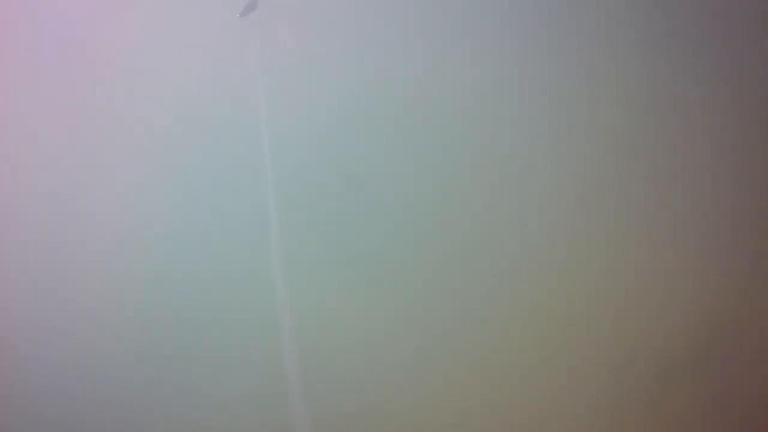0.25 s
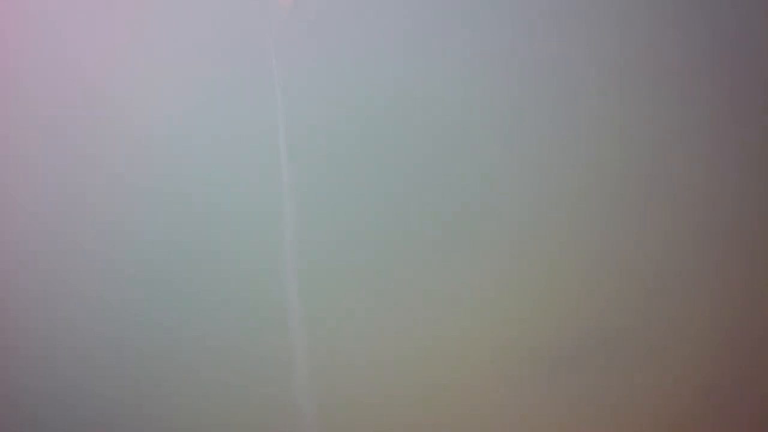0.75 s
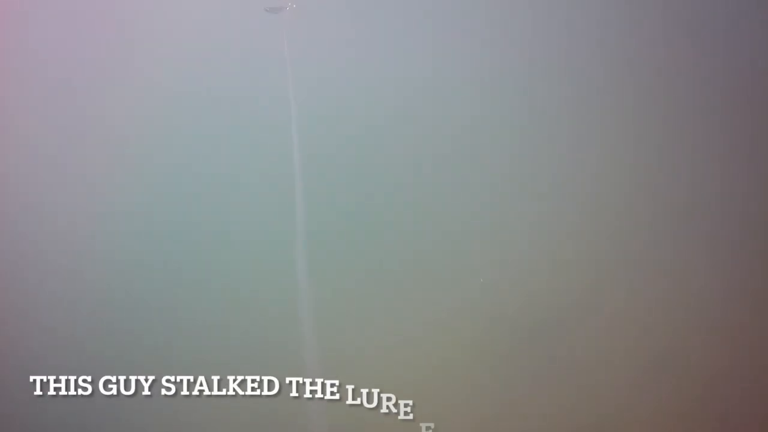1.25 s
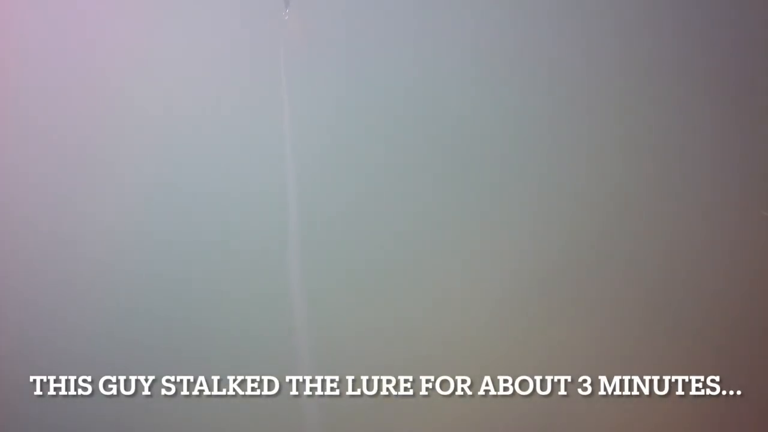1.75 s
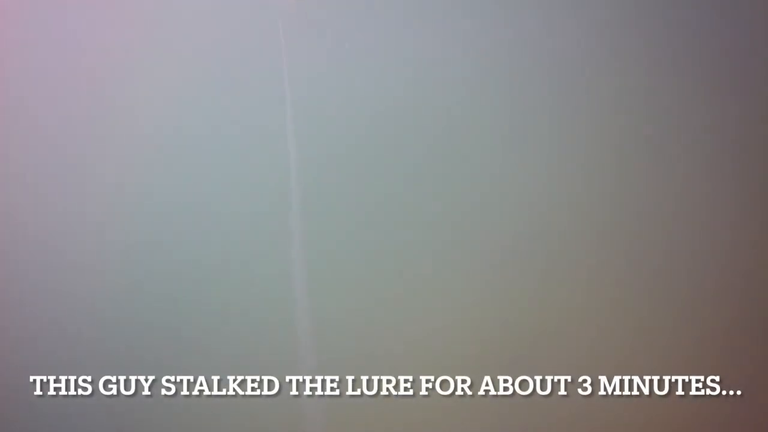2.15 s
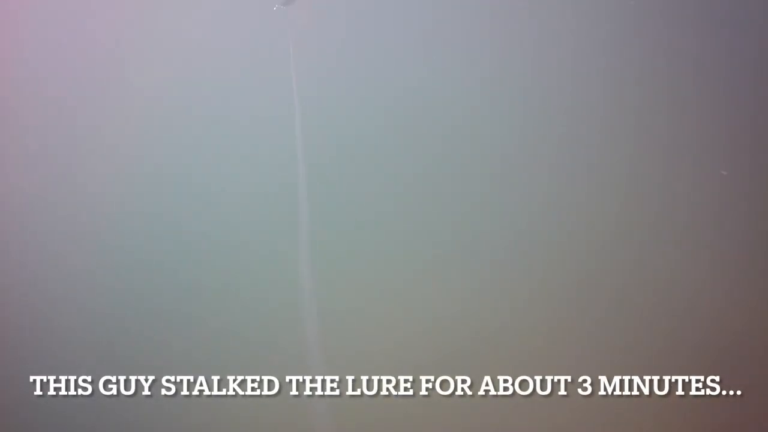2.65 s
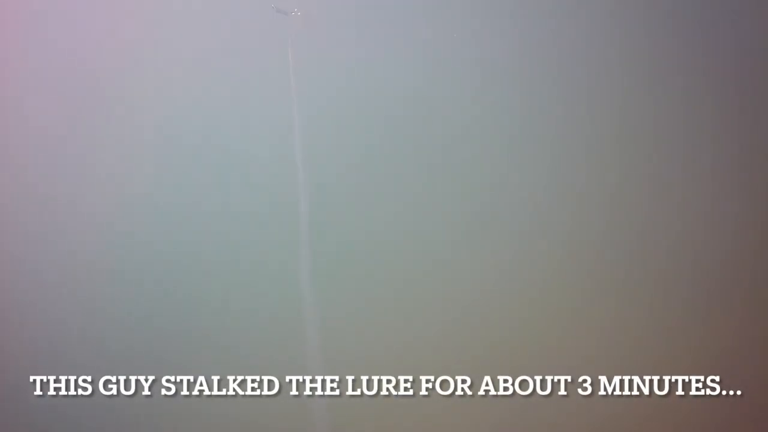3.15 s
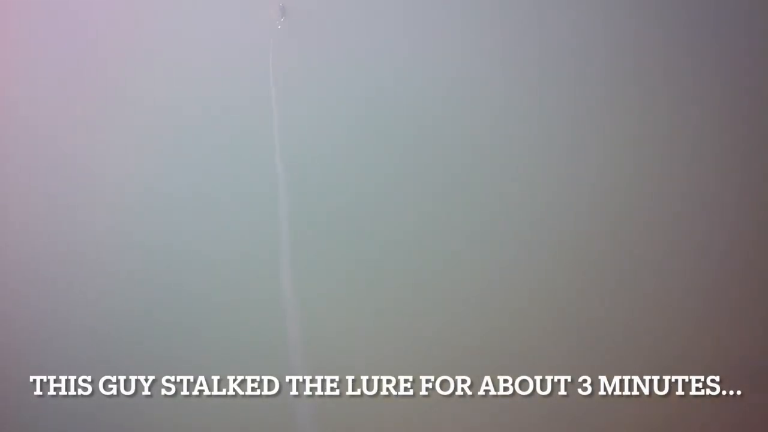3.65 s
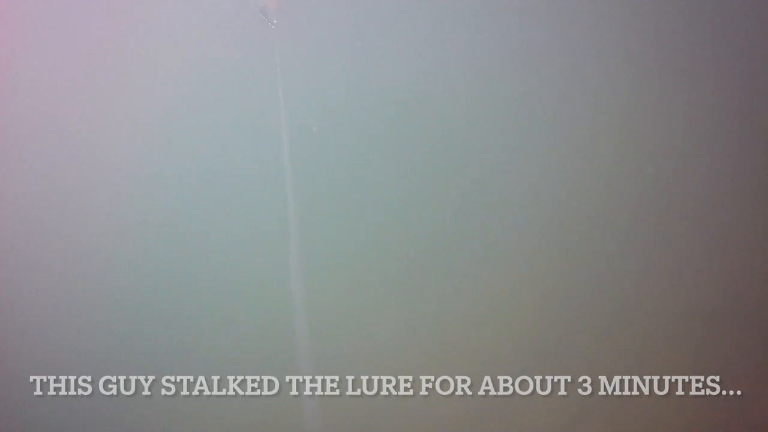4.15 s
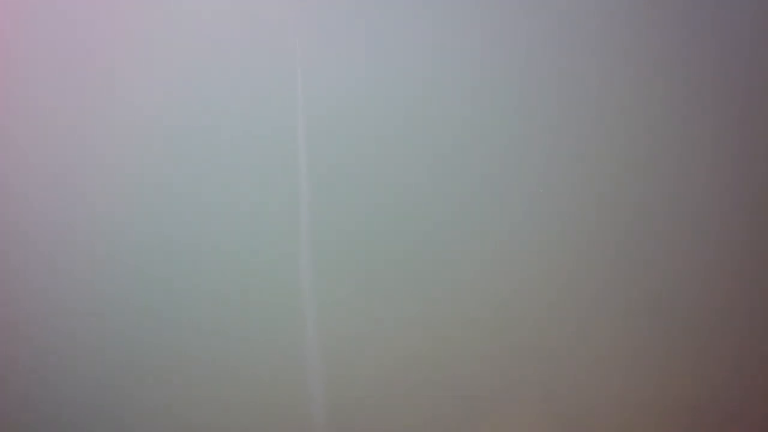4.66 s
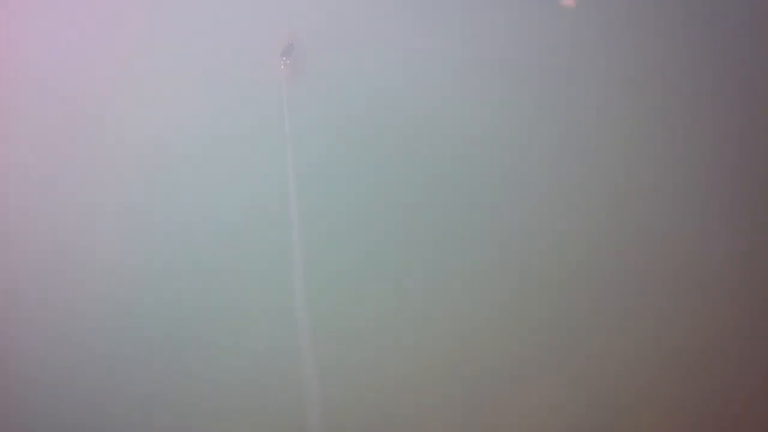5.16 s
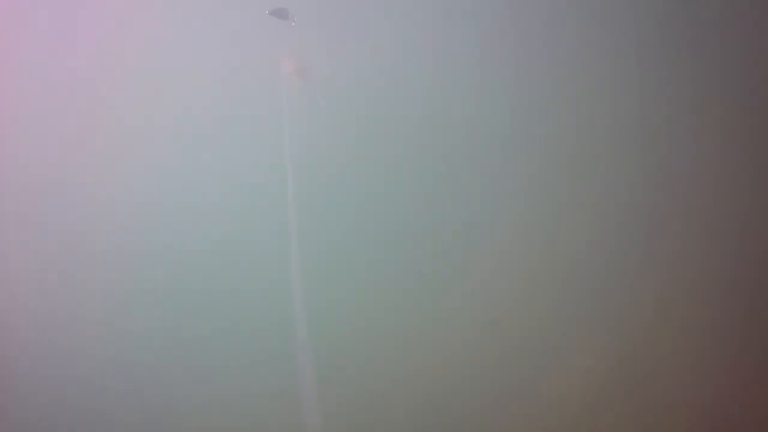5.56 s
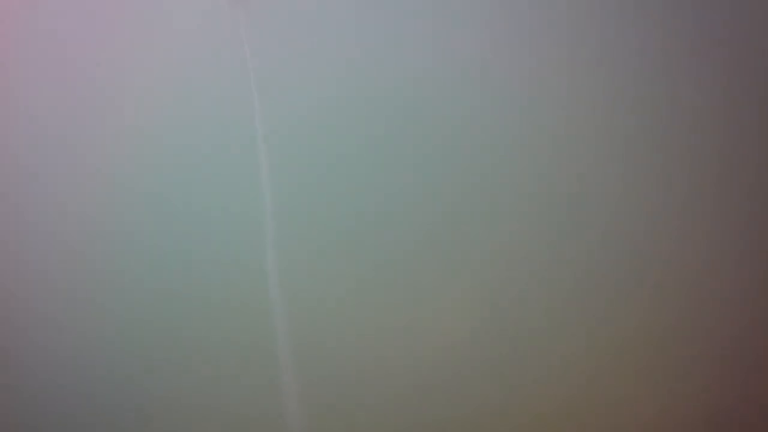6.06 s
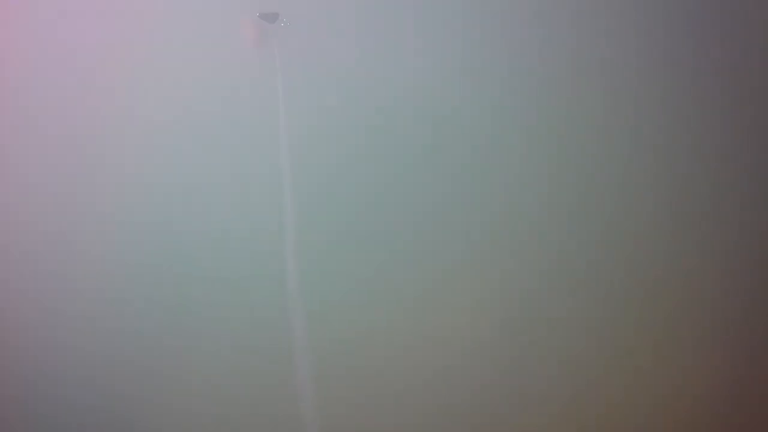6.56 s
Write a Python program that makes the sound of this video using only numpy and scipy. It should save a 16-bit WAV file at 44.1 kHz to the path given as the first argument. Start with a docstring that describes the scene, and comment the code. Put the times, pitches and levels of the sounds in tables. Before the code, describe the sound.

A low, wavering boat motor drone and rumbling water heard from below the surface, with small tackle ticks and a few bubble plinks.

```python
"""Under water behind a boat, heard from inside a towed camera housing through its two microphone ports.
The motor's firing hum arrives by several paths, so it swells and fades differently at each port. Its
overtones and sidebands drone with the hull's resonances inside the rush of water, and a faint gear whine
surfaces once. Close by, a loose tackle part ticks against the housing and a few bubbles plink.
A grainy hiss lies over all."""
import sys
import numpy as np
from scipy import signal
from scipy.fft import rfft, irfft, next_fast_len
from scipy.io import wavfile
from scipy.ndimage import map_coordinates

SR = 44100
rng = np.random.default_rng(int(sys.argv[2]) if len(sys.argv) > 2 else 0)


def pcm_store(signal):
    """Save signal as 16-bit PCM."""
    levels = np.round(np.clip(np.atleast_2d(signal), -1, 1) * 32767)
    wavfile.write(sys.argv[1], SR, levels.astype(np.int16).T)


N = 299880


def amp(db):
    """Decibels to gain."""
    return 10 ** (np.asarray(db) / 20)


def unit(x):
    """Scaled to rms 1."""
    return x / np.sqrt(np.mean(x ** 2) + 1e-20)


def along(points, hz):
    """Interpolates (frequency, value) points on a log frequency axis."""
    freqs, values = np.transpose(points)
    return np.interp(np.log(hz + 1), np.log(freqs + 1), values)


def curves(rows):
    """One value per sample for each column after the time."""
    times, *columns = np.transpose(rows)
    return [np.interp(np.arange(N) / SR, times, column) for column in columns]


def wobble(rate):
    """A random curve, rate knots a second."""
    knots = rng.standard_normal(int(N * rate / SR) + 4)
    return map_coordinates(knots, [np.arange(N) * rate / SR], order=1)


def filtered(x, response):
    """x through a frequency response."""
    size = next_fast_len(N + 8192)
    return irfft(rfft(x, size) * response(np.fft.rfftfreq(size, 1 / SR)), size)[..., :N]


def panned(x, pan_db):
    """Sets the left port pan_db above the right."""
    return x * amp([[pan_db / 2], [-pan_db / 2]])


def port_noise(gain):
    """Stereo noise of rms 1, shaped by gain(hz); the ports agree more as the frequency rises."""
    # (frequency [Hz], left-right correlation [0-1])
    likeness = [(50, 0.017), (80, 0), (150, 0.31), (600, 0.47), (1200, 0.54), (1700, 0.99), (2100, 1)]
    angle = lambda hz: np.arccos(along(likeness, hz)) / 2
    white = rng.standard_normal((2, N))
    mid, side = filtered(white, lambda hz: gain(hz) * [np.cos(angle(hz)), np.sin(angle(hz))])
    return unit(np.array([mid + side, mid - side]))


def hiss():
    """A fine hiss, alike at both ports, whose level flickers quickly."""
    # hiss colour: (frequency [Hz], relative level [dB])
    spectrum = [(6500, 1), (11000, 0.5), (13500, 2), (15700, 3.5)]
    flicker = amp(0.49 * wobble(300) + 0.93 * wobble(5000))
    noise = port_noise(lambda f: amp(along(spectrum, f)) * (f > 2000))
    return amp(-46.5) * unit(flicker * noise)


def water_rush():
    """Turbulence rumbles right on the housing, with a lighter wash above it."""
    # strength of the flow: (time [s], rumble level [dB], wash level [dB])
    flow = [(0, -27, -42.5), (1.1, -25, -42.5), (2.4, -24.5, -42.5), (3.2, -24, -41.5), (4.1, -24.5, -42),
            (4.8, -24.5, -41.5), (5.8, -23.5, -43), (6.8, -24.5, -43.5)]
    # colour of each: (frequency [Hz], relative level [dB])
    rumble_spectrum = [(30, -50), (40, -18), (60, -4.5), (110, -8), (180, -11), (290, -16.5), (540, -24),
                       (600, -30), (900, -47), (2000, -120)]
    wash_spectrum = [(200, -80), (500, -3.5), (800, -0.5), (1500, -7.5), (3000, -12), (4200, -15.5),
                     (4800, -21), (7000, -47), (9000, -120)]
    rumble_db, wash_db = curves(flow)
    rumble = panned(port_noise(lambda f: amp(along(rumble_spectrum, f))), pan_db=0.2)
    wash_gain = amp(wash_db + 0.31 * wobble(11) + 0.88 * wobble(60))
    wash = port_noise(lambda f: amp(along(wash_spectrum, f)))
    return amp(rumble_db) * rumble + wash_gain * wash


def gear_whine(hz=1110, from_s=2.45, to_s=3.46, fade_db_per_s=22):
    """A thin, wavering gear tone that surfaces for a while."""
    t = np.arange(N) / SR
    away_s = np.maximum(0, np.maximum(from_s - t, t - to_s))
    db = -55 - fade_db_per_s * away_s + 4.5 * wobble(14)
    phase = 2 * np.pi * np.cumsum(hz + 5 * wobble(20)) / SR
    return np.sqrt(2) * amp(db) * np.sin(phase)


def droning_tones(tone_share=0.59):
    """The motor hum's overtones and sidebands, with the hull's resonances: wavering tones in noise."""
    # (frequency [Hz], width [Hz], base level before the turn [dB], after it [dB], left over right [dB])
    tones = [(43.2, 3.4, -65, -49, -17), (60.7, 3.06, -37, -29, -6.5), (70.8, 5.18, -31, -40, -3),
             (88.8, 4.6, -33, -39, -6), (100.7, 4.83, -45.5, -34.5, 6), (128.8, 6.35, -49, -34.5, 9.5),
             (149.4, 6.16, -38.5, -34.5, -3), (159.8, 4.36, -46, -36.5, -1), (171.4, 7.13, -59, -31.5, -10),
             (189.6, 5.7, -50, -36, -3.5), (212, 4.4, -37, -45, -6), (243.5, 9.72, -43, -37.5, -3.5),
             (265.8, 9.13, -37.5, -44, 9), (278.5, 4.16, -45.5, -47, 10.5), (315.8, 5.74, -40.5, -45, -6.5),
             (343.7, 4.27, -45.5, -48.5, -1), (365.6, 7.45, -41.5, -44, 2.5), (391, 4.2, -48.5, -59, -3),
             (401, 4.15, -47.5, -57, -3), (469.5, 5.8, -50.5, -49, 5), (521, 21.1, -45, -46, -2.5),
             (603, 4.8, -55, -59.5, 5), (657, 11.7, -54.5, -57.5, 9), (794, 3.28, -59.5, -56.5, -2),
             (834, 6.3, -63, -59.5, -4), (901, 5.05, -63, -61, -6)]
    # the housing turns, shifting the mix: (time [s], share of the turn [0-1])
    swing = [(2.5, 0), (3.3, 0.92), (4.4, 1)]
    # swell of all tones together: (time [s], gain [dB])
    swell = [(0, 0.5), (1.5, -0.5), (3.6, 2.5), (5.0, 0.5), (6.8, -2.5)]
    (turned,), (swell_db,) = curves(swing), curves(swell)
    out = np.zeros((2, N))
    for hz, width, before_db, after_db, pan_db in tones:
        ring = port_noise(lambda f: 1 / (1 + (2 * (f - hz) / width) ** 2))
        phase = 2 * np.pi * np.cumsum(hz + 0.3986 * width * wobble(8)) / SR
        port_drift = 1.06 * np.array([wobble(1.99), wobble(2.024)])
        tone = np.sqrt(2) * np.sin(phase + port_drift)
        drone = np.sqrt(1 - tone_share) * ring + np.sqrt(tone_share) * tone
        out += amp(before_db + turned * (after_db - before_db) + swell_db) * panned(drone, pan_db)
    return out


def bubble_plinks(attack_s=0.00086, t60_s=0.025):
    """A small bubble bursting at the port rings for a few dozen cycles, rising a little in pitch."""
    # (time [s], level [dB], starting pitch [Hz])
    bubbles = [(0.6285, -37, 2970), (0.7068, -30.5, 2540), (1.079, -42, 1810), (1.1233, -32, 2400),
               (1.1794, -40, 2050), (1.6222, -37, 2800), (1.7609, -33, 2460), (2.075, -32, 2500),
               (3.3393, -40, 2360), (5.3327, -36, 2180), (5.8533, -34, 2360)]
    out, t = np.zeros(N + SR), np.arange(SR // 20) / SR
    for s, db, hz in bubbles:
        ring = np.sin(2 * np.pi * hz * (t + 1.6 * t * t)) * (1 - np.exp(-t / attack_s))
        out[round(s * SR):][:len(t)] += amp(db - 60 * t / t60_s) * ring
    return out[:N]


def tackle_ticks(attack_s=0.00044, crack_t60_s=0.0051, small_per_s=340):
    """A loose part strikes the housing and rings it briefly: clear ticks among many small random ones."""
    # housing modes: (frequency [Hz], relative level [dB], time to fall 60 dB [s])
    modes = [(2850, -3.5, 0.012), (3650, -1, 0.0085), (3827, 0, 0.0081), (4067, -2, 0.012),
             (5360, 2.5, 0.0057), (5600, 2, 0.016)]
    # clear contacts: (time [s], strength [dB])
    contacts = [(0.0423, -33), (0.7951, -35), (1.3678, -34), (1.3902, -36), (1.6656, -33.5), (1.898, -36),
                (1.9674, -34), (2.0757, -36), (2.6998, -34), (2.785, -34), (2.8389, -37), (3.1462, -38),
                (3.34, -36.5), (3.491, -33), (3.5653, -35), (3.6373, -37), (3.704, -36), (3.92, -33),
                (4.0567, -35), (4.114, -36), (4.35, -30), (4.3919, -31), (4.4985, -33), (4.5563, -36),
                (4.6314, -37), (4.6857, -32), (4.7294, -33), (4.7706, -30), (4.9651, -41), (5.1208, -32),
                (5.14, -36), (5.2274, -37), (5.3208, -38), (5.3963, -36), (5.462, -31), (5.5487, -35),
                (5.6022, -32), (5.6545, -31), (5.677, -36), (5.8249, -37), (5.9189, -41), (6.1665, -36),
                (6.2211, -41), (6.344, -34)]
    # small contacts: (time [s], strength [dB], spin of the part [turns/s])
    rattle = [(0, -47, 14), (1.4, -47, 13.5), (1.75, -45, 14.2), (2.2, -49, 14.3), (3.9, -47.5, 14),
              (4.6, -43, 21), (5.6, -45, 18.5), (6.8, -46.5, 14.8)]
    t = np.arange(SR // 30) / SR
    attack = 1 - np.exp(-t / attack_s)
    rings = [amp(db - 60 * t / t60) * np.sin(2 * np.pi * hz * t) * attack for hz, db, t60 in modes]
    upper = np.array([hz > 5000 for hz, *_ in modes] + [False])  # contacts ring these modes less
    blows = np.zeros((len(modes) + 1, N))  # a row per mode, and one for the crack
    for s, db in contacts:
        scatter, polarity = rng.standard_normal((2, len(blows)))
        blows[:, round(s * SR)] = amp(db - 14.5 * upper + 1.3 * scatter) * np.sign(polarity)
    rattle_db, spin_hz = curves(rattle)
    spin_phase = 2 * np.pi * np.cumsum(spin_hz * (1 + 0.078 * wobble(6.8))) / SR
    spin_db = 3 * np.cos(spin_phase)  # the part strikes hardest once a turn
    touches = rng.random(N) < small_per_s / SR
    force = touches * amp(rattle_db + spin_db + 2.83 * rng.standard_normal(N))
    small_blows = force * rng.standard_normal(blows.shape)  # each finds another spot
    small_blows[upper] *= amp(-10)
    crack = amp(-4.5 - 60 * t / crack_t60_s) * rng.standard_normal(len(t))
    return signal.fftconvolve(blows + small_blows, rings + [crack], axes=1).sum(0)[:N]


def motor_hum(left_lag_rad=0.77):
    """The firing tone arrives by several paths that add and cancel, swelling differently at each port."""
    # the motor's firing: (time [s], rate [Hz])
    firing = [(0, 50.5), (.8, 50.7), (1.4, 51.0), (3.7, 51.22), (4.4, 50.74), (5.0, 49.93), (5.9, 49.84),
              (6.8, 50.3)]
    # fundamental at the ports: (time [s], left level [dB], right level [dB])
    swells = [(0.08, -17, -12.5), (0.47, -26.5, -20), (1.0, -20.5, -12.5), (1.3, -25, -12),
              (1.72, -13.5, -13), (2.02, -18.5, -21.0), (2.25, -19, -43), (2.48, -21, -30),
              (2.68, -25.5, -40), (2.9, -35, -32), (3.3, -26, -11.5), (3.66, -30, -12.0), (4.0, -12.5, -11),
              (4.33, -29, -30), (4.55, -18.5, -38), (4.9, -15, -13.5), (5.22, -30.0, -26), (5.58, -14, -21),
              (5.9, -23.5, -27), (6.299, -14.5, -13), (6.62, -29, -28), (6.76, -18, -15.5)]
    # third harmonic: (time [s], level [dB])
    third_levels = [(.4, -36), (1.0, -31), (2.0, -31), (2.6, -40), (3.6, -40), (4.5, -50)]
    (hz,), (third_db,) = curves(firing), curves(third_levels)
    phase = 2 * np.pi * np.cumsum(hz) / SR
    gains = np.array(curves([(s, *amp(db)) for s, *db in swells]))
    fundamental = gains * np.sin([phase - left_lag_rad / 2, phase + left_lag_rad / 2])
    third = amp(third_db + 3.1 * wobble(5.12)) * np.sin(3 * phase)
    return np.sqrt(2) * (fundamental + third)


def scene():
    """The boat ahead and the sounds right at the housing, as they reach the two ports."""
    boat = motor_hum() + droning_tones() + gear_whine()
    return boat + water_rush() + tackle_ticks() + bubble_plinks() + hiss()


def record(dry):
    """The camera keeps nothing above its band limit."""
    return filtered(dry, lambda hz: hz < 15730)


dry = scene()
out = record(dry)
pcm_store(out)
```